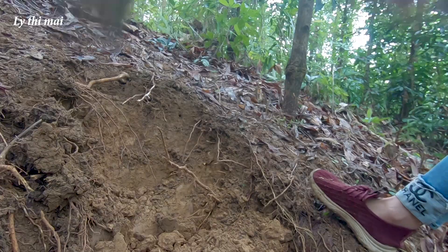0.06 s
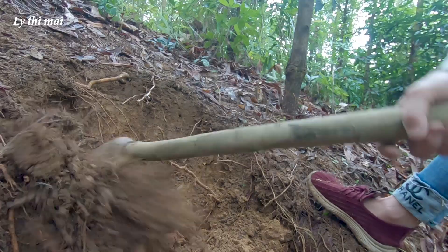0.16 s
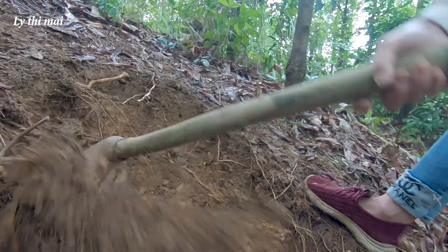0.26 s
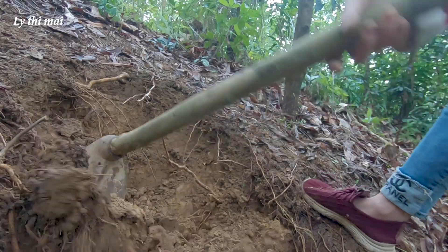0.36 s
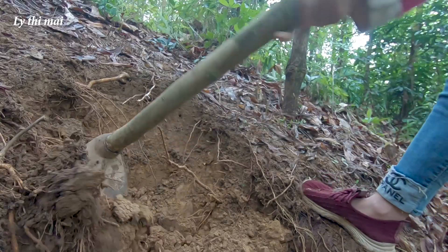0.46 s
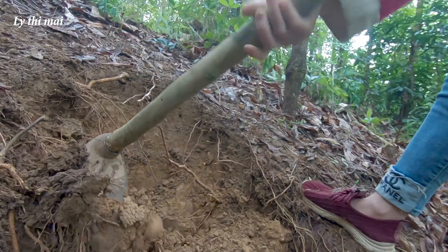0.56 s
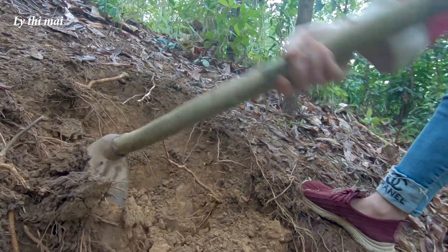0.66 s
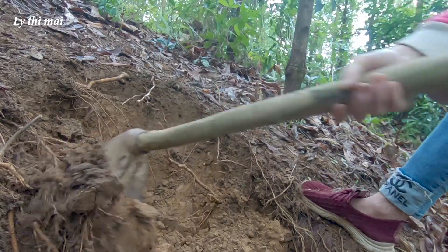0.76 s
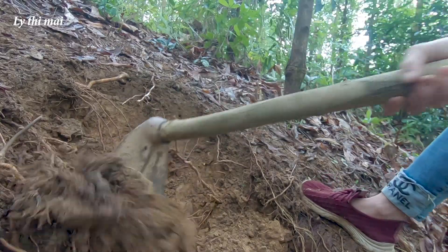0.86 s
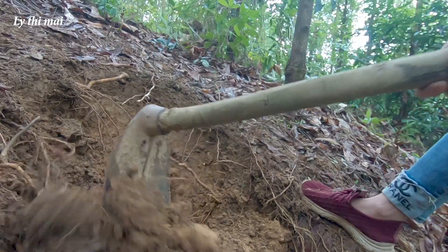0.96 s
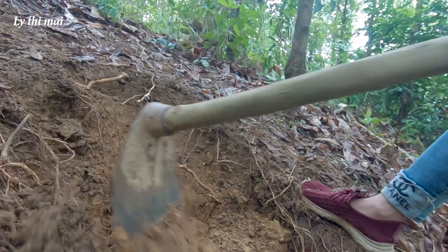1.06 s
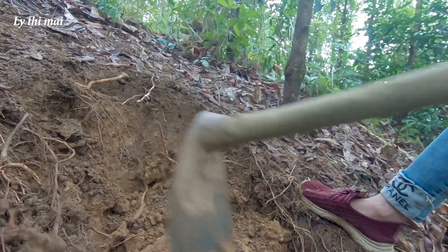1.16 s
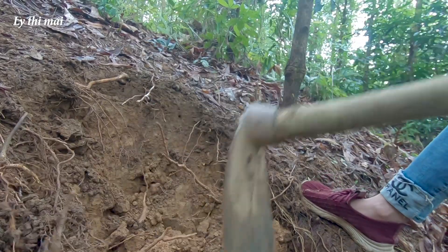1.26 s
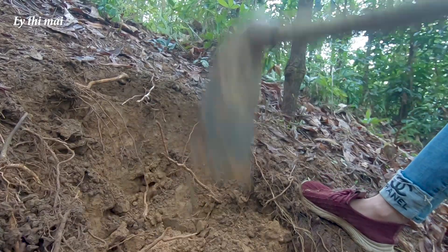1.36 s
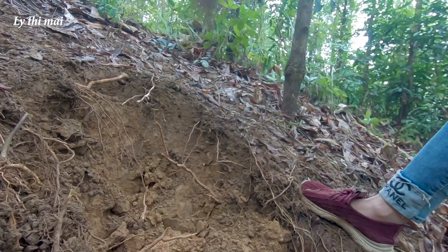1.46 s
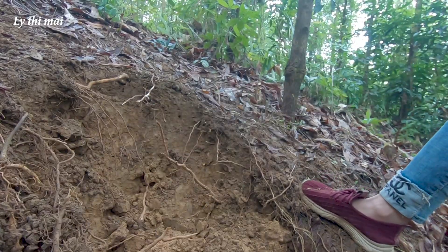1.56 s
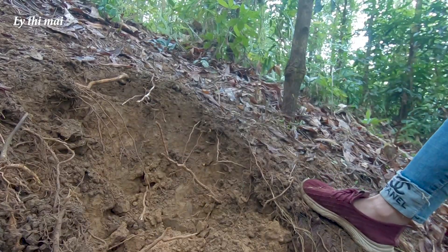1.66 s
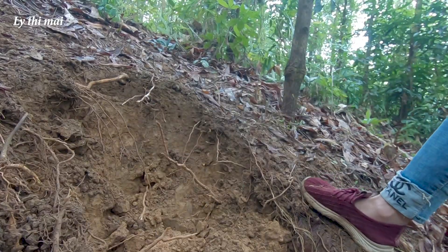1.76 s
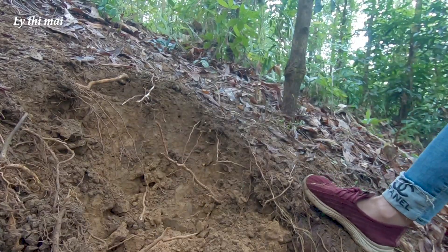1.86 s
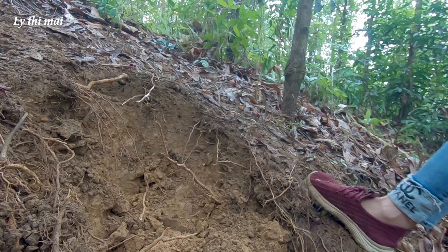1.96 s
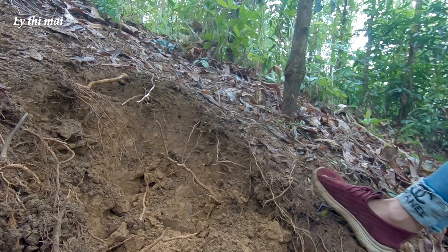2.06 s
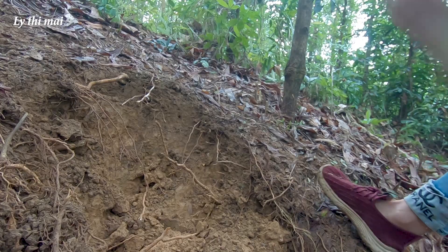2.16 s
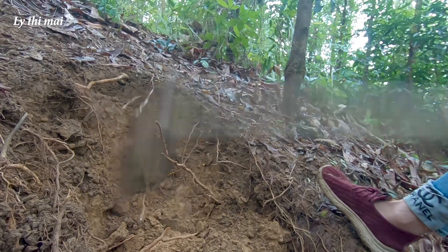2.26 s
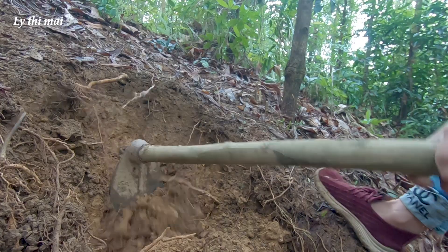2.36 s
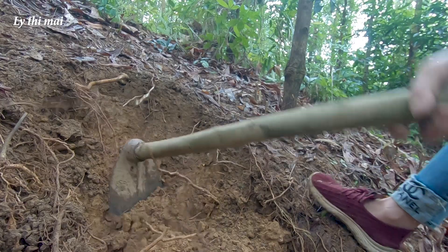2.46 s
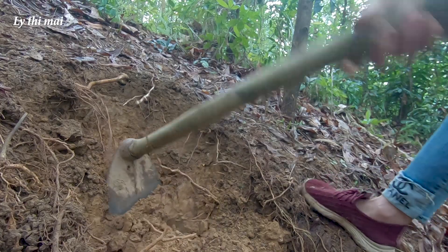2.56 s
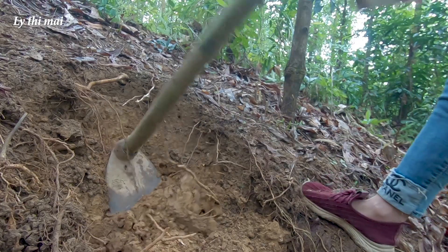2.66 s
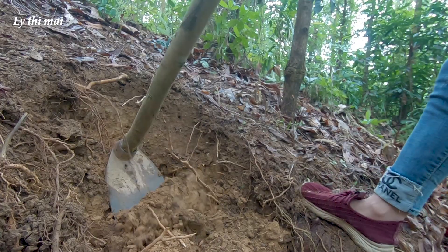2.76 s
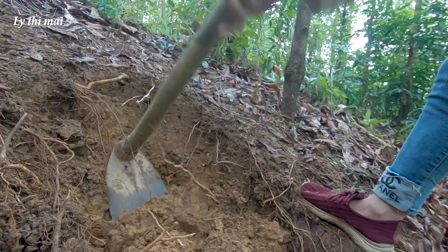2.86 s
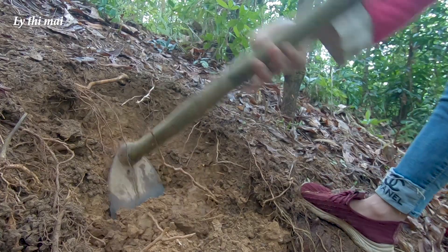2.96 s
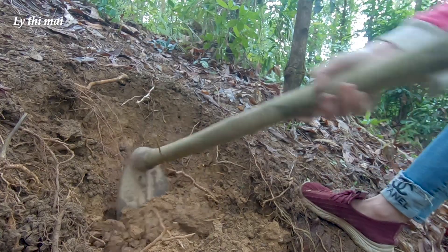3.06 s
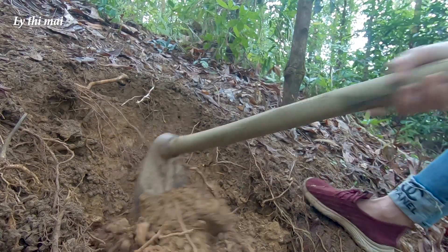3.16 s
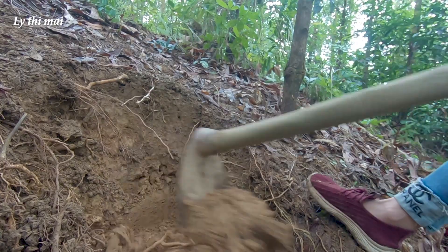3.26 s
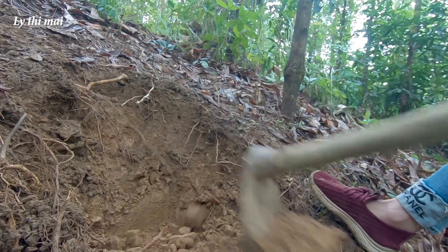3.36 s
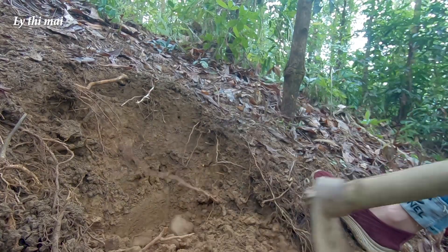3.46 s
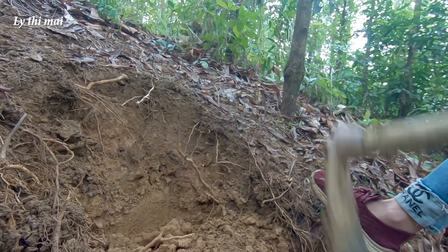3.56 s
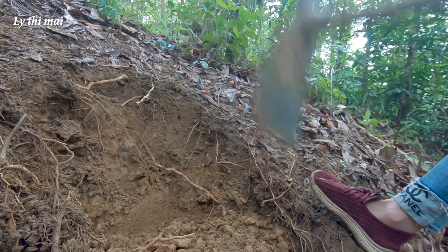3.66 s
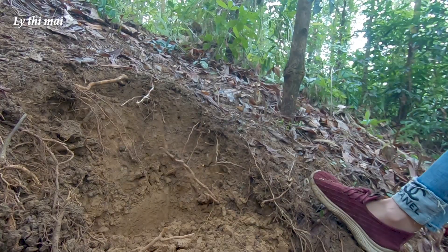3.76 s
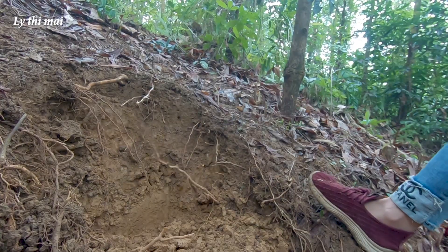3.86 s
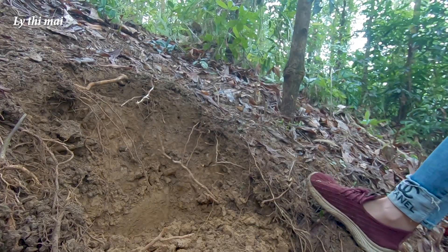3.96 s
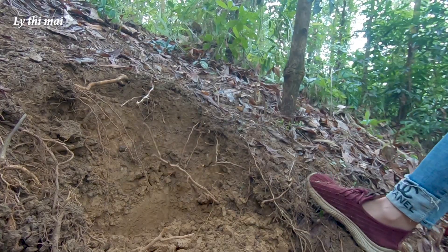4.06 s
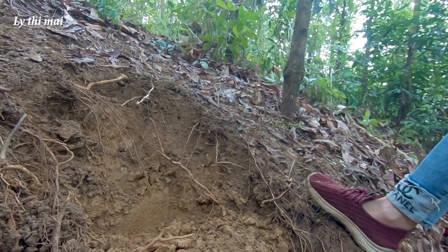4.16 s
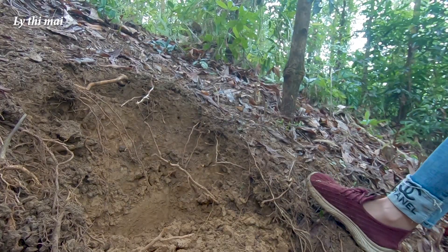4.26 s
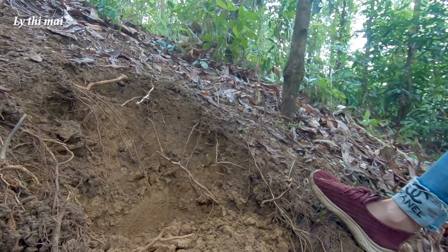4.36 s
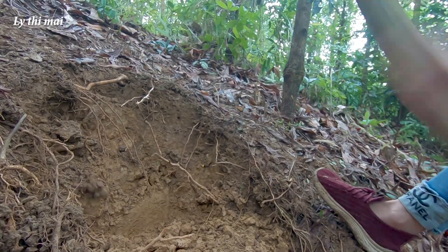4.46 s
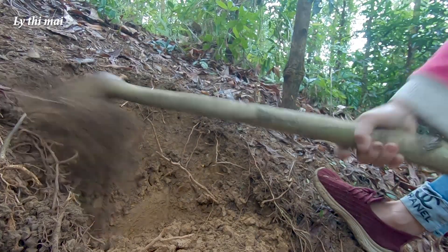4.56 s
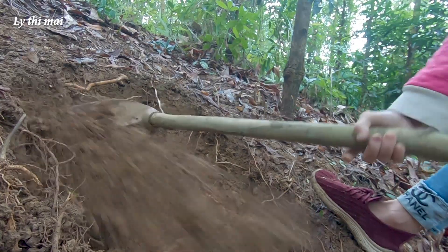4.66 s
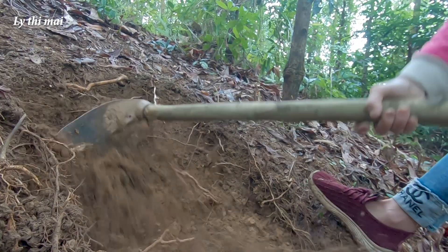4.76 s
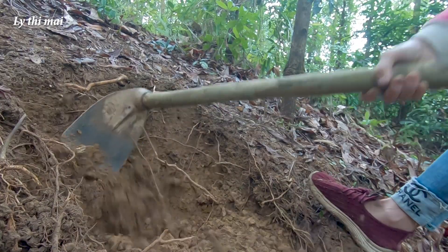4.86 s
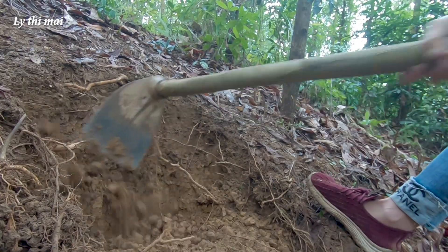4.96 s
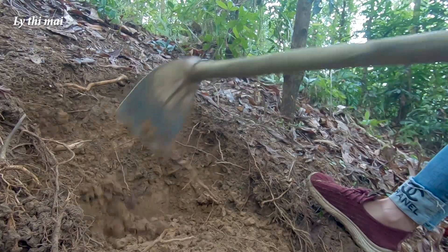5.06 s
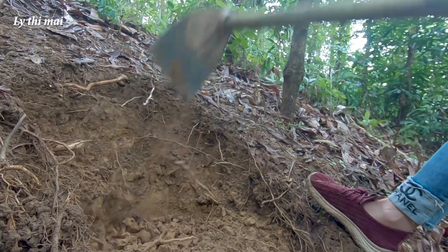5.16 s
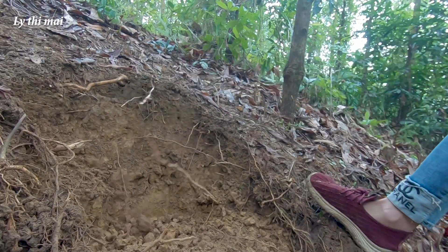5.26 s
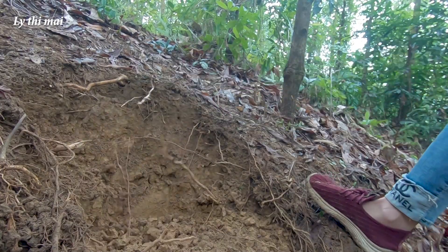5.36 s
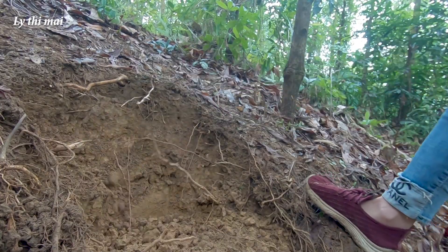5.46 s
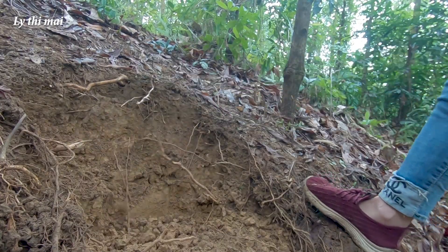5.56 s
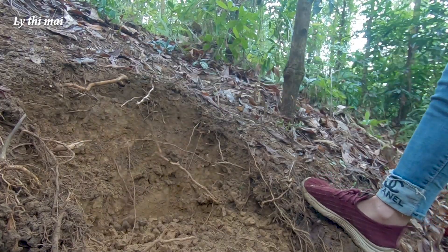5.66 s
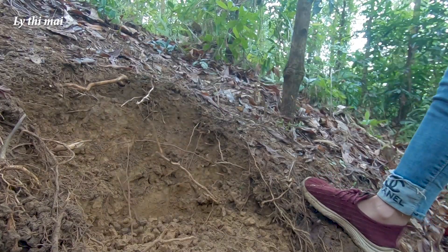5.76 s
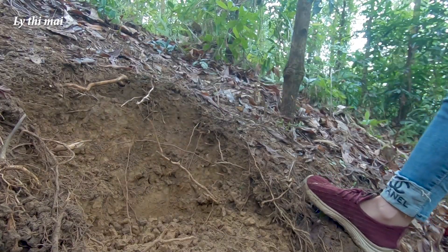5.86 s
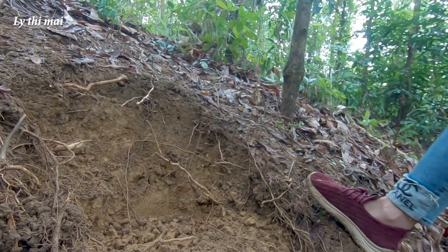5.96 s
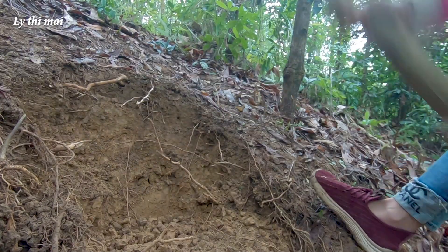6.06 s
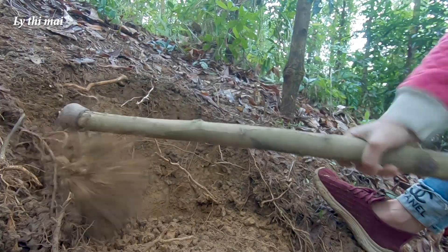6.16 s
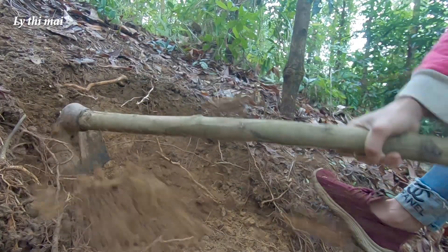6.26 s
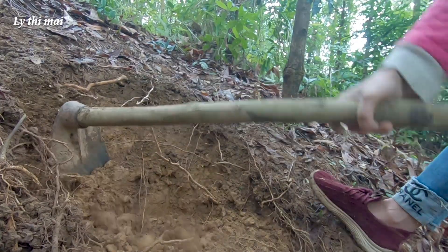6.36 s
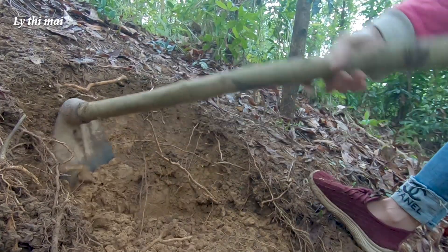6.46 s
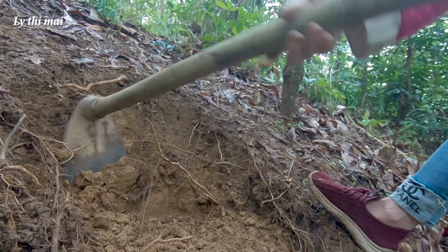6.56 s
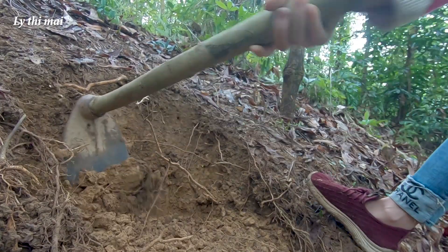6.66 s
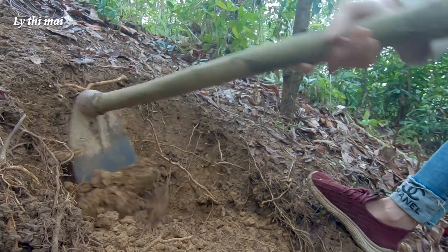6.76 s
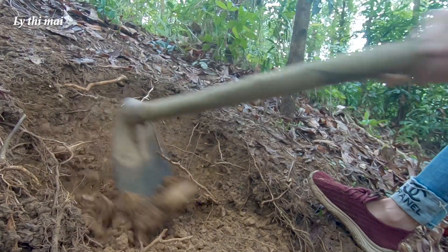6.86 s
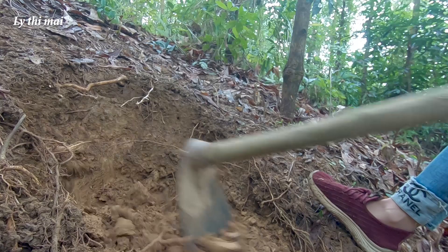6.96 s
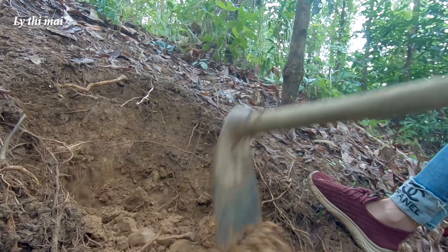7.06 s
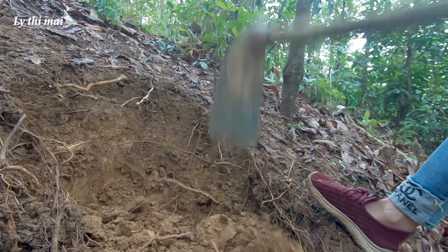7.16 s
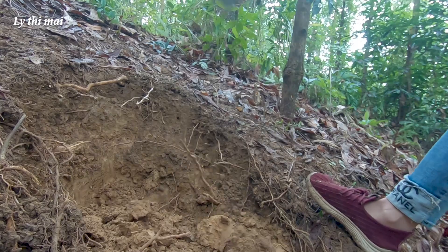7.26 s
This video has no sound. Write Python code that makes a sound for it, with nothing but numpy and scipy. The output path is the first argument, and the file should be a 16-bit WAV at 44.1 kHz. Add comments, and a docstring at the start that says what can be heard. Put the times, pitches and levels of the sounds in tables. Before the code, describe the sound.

Five heavy hoe chops crunch and thud into a dry earth bank close by, with crumbs pattering down and roots snapping in quiet woods.

```python
"""Five chops of a steel hoe into a dry earth bank, about a metre from a small camera in a quiet forest.
Each chop crushes soil (streams of grain impacts shaped by pushes), thumps the ground (decaying sines) and
rings the blade (resonances). Steel scrapes, roots snap, hollow knocks sound, crumbs and sand run down (grain
streams). A faint insect-like hiss near 5.5 kHz (filtered noise) is heard more clearly later on.
The sound starts mono and opens to stereo."""
import sys
import numpy as np
from scipy import signal
from scipy.fft import rfft, irfft
from scipy.io import wavfile
from scipy.ndimage import uniform_filter1d

SR = 44100
rng = np.random.default_rng(int(sys.argv[2]) if len(sys.argv) > 2 else 0)


def store_wav(level_fs):
    """Save 16-bit WAV to argv[1]."""
    pcm = np.round(np.clip(np.atleast_2d(level_fs), -1, 1) * 32767)
    wavfile.write(sys.argv[1], SR, pcm.T.astype(np.int16))


N = 322812
TIME = np.arange(N) / SR
TICKS = np.arange(0, N / SR + .001, .001)  # envelope clock, s

# Quiet forest air. Each row: frequency in Hz, relative density in dB per Hz.
FOREST_COLOUR = [(60, -8), (135, -12), (185, 2.5), (225, -2), (290, -12.5), (520, -16.5), (790, -9),
                 (1100, -19), (1550, -14.5), (3200, -19.5), (4150, -9.5), (6500, -27.5), (10000, -32),
                 (15000, -61.5)]
FOREST_DB = -62.5
# Faint insect-like hiss, level as heard through the camera. Each row: time in seconds, level in dB.
INSECT_HISS = [(0, -81), (2.3, -82.5), (2.6, -71.5), (4.3, -64.5), (5.7, -65), (7.32, -61)]
# Low rumble of the air. Each row: time in seconds, level in dB.
AIR_RUMBLE = [(0, -50.5), (3.3, -55.5), (5.6, -69), (7.32, -64.5)]
# Rumble and puff colour. Each row: frequency in Hz, relative gain in dB.
LOWS_COLOUR = [(15, -4.5), (35, 6.5), (60, -0.5), (110, -9), (190, -1), (250, -17.5), (400, -27.5),
               (1000, -58)]
# Faint tone on the downswing before the third chop.
SWING_S, SWING_DB, SWING_RISE_S, SWING_FALL_S = 2.31, -60.5, .17, .055

# Loose earth sliding. Each row: start in seconds, length in seconds, levels in dB of clods,
# crumbs and sand, as heard; the camera muffles the sand before about 2.4 s.
SLIDES = [(0, 0.48, -67, -66.5, -100), (.29, 0.17, -61.5, -53.5, -70), (0.498, .13, -55, -48, -67.5),
          (0.659, 0.26, -61, -51.5, -70.5), (0.736, 0.0048, -53, -39.5, -56),
          (0.977, 0.23, -52, -48, -61.5), (1.239, 0.045, -44, -40.5, -69), (1.722, 0.2, -65.5, -54.5, -75),
          (2.4, 0.37, -59.5, -55, -63), (2.89, 0.43, -69, -62, -64), (3.148, 0.033, -55, -49, -55.5),
          (3.369, 0.086, -51.5, -49.5, -57), (3.539, 0.043, -53.5, -50.5, -55.5),
          (3.651, 0.39, -61.5, -56, -55), (3.805, 0.12, -58.5, -54, -48), (4.133, 0.025, -69, -49.5, -48),
          (4.695, .57, -60.5, -53.5, -50.5), (4.837, 0.003, -45, -35.5, -39), (6.253, 0.3, -68, -58, -59),
          (6.586, 0.13, -47, -43.5, -41), (6.74, .1, -48, -46.5, -44), (6.911, 0.22, -52.5, -53, -52.5),
          (7.105, 0.02, -51, -45, -46)]
SLIDE_RISE_S, SLIDE_SAG_DB_PER_S = .023, 2.5
SETTLE_S, SETTLE_SHARE = .0079, .07  # fall time: a base plus a share of the slide's length
TRICKLE_DB, TRICKLE_S = -6.5, .4  # stragglers: level after a one-second slide, fall time
# Particle colours. Each row: frequency in Hz, relative gain in dB.
CLODS_COLOUR = [(100, -10.5), (220, -5), (380, -4.5), (600, -7.5), (1000, -2), (1400, 0.5), (2200, -24.5),
                (6000, -58.5)]
CRUMBS_COLOUR = [(700, -21), (1300, -3.5), (1800, 1), (2400, 0.5), (3100, 4), (4200, 0), (5200, -14),
                 (8000, -42), (15000, -65)]
SAND_COLOUR = [(3000, -24), (4600, -6), (5600, -4), (7200, 1.5), (8400, -6.5), (10000, -9.5), (11500, -20),
               (15000, -20.5)]
# Bursting crumbs. Each row: frequency in Hz, relative gain in dB.
CRACKLE_COLOUR = [(200, -21.5), (400, -5), (900, -5.5), (1600, 1), (4200, -1), (5500, -20.5), (9000, -17.5),
                  (15000, -41.5)]
CRACKLE_DB = -5.5  # relative to the patter
ROLL_DB = -4  # rumble relative to the clod level
# Low rumble swelling just before and around a heavy chop. Each row: start of the hold in seconds,
# hold in seconds, level in dB.
CHOP_RUMBLES = [(0.206, 0.34, -46.5), (2.397, 0.077, -43), (4.671, 0.086, -45), (6.25, 0.026, -45)]
RUMBLE_RISE_S, RUMBLE_FALL_S = .056, .079

# Modes of the bank. Each row: frequency in Hz at pitch 1, relative level in dB, t60 in seconds.
GROUND = [(43.3, -17.5, 0.32), (77, -8.5, 0.16), (129.5, 0, 0.078), (189.9, -3, 0.065)]
# Levering, heavy clods and a shifting foot. Each row: time in seconds, thud peak in dB, pitch as a multiple of
# the modes.
THUMPS = [(0.481, -31, .6), (.893, -28.5, 1.1), (2.662, -31, 1.3), (3.54, -37.5, 1), (5.084, -35.5, 1),
          (6.115, -40, 1), (6.431, -30, .9), (6.525, -22, .8), (6.791, -29.5, 1.2), (6.95, -32, 1),
          (7.086, -31.5, 1.2)]
THUD_LAG_MS, REBOUND_LAG_MS, REBOUND_PITCH = 2.5, 20, .68  # pitch relative to the thud

# Blade and handle. Each row: mode frequency in Hz, relative level in dB, t60 in seconds at damping 1.
HOE = [(506, -14, .07), (620, -16.5, .05), (770, -9, 0.1), (910, -10, .06), (1195, -10.5, .06),
       (1582, -5, .09), (1990, -4, 0.1), (3045, 4, 0.065), (3130, 2, 0.029), (3420, -5, 0.05),
       (4130, 6, 0.065), (4580, -4, 0.09), (6400, -3, 0.14), (8480, -9, 0.13), (10850, -20, .05)]
# Earth scraping on free steel. Each row: peak in seconds, rise in seconds, fall in seconds,
# coarse soil in dB, fine sand in dB.
SCRAPES = [(1.154, .011, 0.0064, -45, -29), (1.252, 0.033, 0.017, -35, -40.5), (1.4, .15, .1, -61, -66.5),
           (1.887, .06, 0.012, -46, -53), (2.0, .1, 0.24, -80.5, -74), (5.083, 0.011, .01, -28, -52)]
# Squeaks. Each row: time in seconds, rms in dB at the middle, pitch in Hz there, half length in ms.
SQUEAKS = [(1.496, -45.5, 1379, 12), (6.465, -44, 1690, 15.3), (6.565, -45, 1380, 8),
           (6.598, -36.5, 1300, 4)]
# Hollow knocks: clods landing, and the low-mid body of four chops.
# Each row: time in seconds, peak in dB, pitch in Hz.
KNOCKS = [(.236, -13.5, 500), (.897, -32.5, 630), (1.077, -42, 400), (1.156, -12, 430), (2.414, -9.5, 700),
          (2.595, -42, 900), (3.21, -38.5, 880), (3.363, -35.5, 500), (3.385, -37.5, 344),
          (3.409, -39, 400), (3.438, -34.5, 395), (3.903, -33, 1000), (5.084, -32.5, 790),
          (6.254, -15, 354), (6.695, -35.5, 900), (6.789, -40, 280), (6.949, -26.5, 620),
          (7.092, -34.5, 326), (7.122, -39.5, 410)]
# Roots and twigs snapping, pebbles ticking. Each row: time in seconds, centre peak in dB before the
# treble cut, pitch in Hz, left minus right in dB.
SNAPS = [(0.124, -39, 2020, -22), (.362, -33, 2840, 3), (0.482, -28, 1690, -5), (0.614, -30, 1330, 7),
         (1.021, -26.5, 2530, -5), (1.599, -39.5, 2530, -9), (2.558, -31, 3220, 1), (2.63, -17, 1870, -3.5),
         (2.77, -23, 2880, -1), (3.32, -33.5, 6440, -1), (3.411, -24, 1660, 1), (3.56, -35, 3040, -1),
         (3.84, -30, 6800, -19), (4.31, -41.5, 2320, 2), (4.404, -37, 6800, 0), (4.802, -21, 6500, -4),
         (4.829, -21.5, 1640, -5), (4.947, -26, 7200, -8), (4.998, -26.5, 6360, -6),
         (5.279, -28.5, 6400, -20), (5.814, -39.5, 2150, -2.5), (6.446, -12.5, 3420, -9),
         (6.462, -22, 1940, 7), (6.476, -19, 7600, -4), (6.496, -8, 6260, -16), (6.498, -21, 3280, 4),
         (6.52, -30, 1900, 5), (6.562, -24.5, 1400, 0)]
# Steel clipping a stone. Each row: time in seconds, peak in dB, contact in ms.
STONES = [(1.1552, -3, 0.052), (5.0814, -22.5, 0.071)]

# Soil and grit colours. Each row: frequency in Hz, relative gain in dB.
CRUSH_COLOUR = [(200, -18.5), (450, -13.5), (620, 0), (850, -0.5), (1400, 1.5), (1950, 5.5), (2600, -4),
                (4300, 1), (5400, -24), (9000, -43), (16000, -74)]
GRIT_COLOUR = [(2500, -31.5), (4500, -0.5), (5500, -3), (6800, -0.5), (8500, -11.5), (11000, -21.5),
               (15000, -32.5)]
# Lumps crushed between chops. Each row: time in seconds, level in dB, softness in ms, relative grit in dB.
CRUNCHES = [(0.495, -39.5, 2, -25), (.716, -33, .9, -11.5), (0.894, -37, 3, -41), (2.444, -41.5, 5.5, 0),
            (2.629, -31.5, 2, -17), (2.705, -31.5, 1.9, -13), (3.44, -30, 1.7, -18), (3.908, -46, 4.8, -3),
            (4.847, -33, 6.6, -5), (6.95, -37, 2.7, 2), (7.108, -39.5, 2.4, 9)]
# Chops: the edge enters the crust, the blade bites, then jams. Each row: bite in seconds, bite in dB,
# soil softness in ms, relative grit in dB as heard, relative blade ring in dB, left minus right in dB,
# entry lead in ms, entry in dB, stop lag in ms, stop in dB, thud peak in dB,
# thud pitch as a multiple of the modes, rebound peak in dB.
CHOPS = [(0.2314, -14, 5.47, -29, -10, -9, 16, -43.5, 19, -18, -6.5, 1.15, -4.5),
         (1.1565, -19, 1.67, -3.5, -2, -6, 9.9, -36.5, 5.4, -41, -10.5, 1.2, -25),
         (2.41, -17.5, 3.7, -17, -13, 9, 18.5, -26, 7.6, -16.5, -4, 1, -15.5),
         (4.6712, -17, 2.5, -4, -6.5, 19, 4.9, -27.5, 15, -23, -6.5, .85, -8),
         (6.2542, -10.5, 1.77, -8, -13, 6.5, 8.8, -25, 12.5, -30, -5, 1, -33.5)]
ENTRY_RISE, CRUNCH_RISE, BITE_FALL = .7, 1, 2.4  # rise and fall times as multiples of the softness
ENTRY_FALL_MS, ENTRY_GRIT_DB, ENTRY_RING_DB = 5.5, -1, 8.5  # still free, the blade rings more
STOP_RISE_MS, STOP_FALL_MS, STOP_GRIT_DB = 1.6, 5.6, 6.5
ENTRY_PAN_DB, STOP_PAN_DB = -1, -1.5  # left minus right
CRUNCH_RING_DB = -8.5

# Microphone response. Each row: frequency in Hz, gain in dB.
MICROPHONE = [(20, -6), (45, -1.5), (7500, -2.5), (10000, -2.5), (13000, -4), (16000, -9.5)]
# Stereo width of the camera. Each row: time in seconds, share from 0 to 1.
WIDTH = [(0, 0), (1.9, 0.01), (2.4, 0.27), (3.3, 0.5), (3.8, 1), (7.32, 1)]
TOP_HZ = 15700


def undb(db):
    """Decibels to gain."""
    return 10 ** (np.asarray(db) / 20)


def curve(table):
    """Points joined by straight lines, one value per sample."""
    return np.interp(TIME, *np.transpose(table))


def smooth(envelope):
    """Fill a per-ms envelope in to one value per sample."""
    return np.interp(TIME, TICKS, envelope)


def swell(s, rise_s, fall_s, hold_s=0):
    """Per-ms envelope: exponential rise up to time s, hold, exponential fall."""
    before = np.maximum((s - TICKS) / rise_s, 0)
    after = np.maximum((TICKS - s - hold_s) / fall_s, 0)
    return np.exp(-np.minimum(before + after, 30))


def unit(x):
    """Scale a stereo sound so that its centre has rms 1."""
    return x / np.sqrt(np.mean(x.mean(0) ** 2))


def steady(x, span_s):
    """Even out the slow level to about rms 1, leaving single grains standing."""
    size = int(span_s * SR / 2) + 1
    power = uniform_filter1d(x.mean(0) ** 2, size)
    return x / np.sqrt(np.abs(uniform_filter1d(power, size)) + 1e-12)


def add(out, s, x):
    """Mix a short sound in at time s."""
    i = int(s * SR)
    out[..., i:i + x.shape[-1]] += x[..., :N - i]


def sides(pan_db):
    """Left and right gains that keep the centre level."""
    gain = undb(np.array([[pan_db], [-pan_db]]) / 2)
    return gain / gain.mean()


def lowpass(x, hz):
    """Fourth-order treble cut."""
    return signal.sosfilt(signal.butter(4, hz, fs=SR, output="sos"), x)


def resonate(x, hz, width_hz):
    """Two-pole resonance with gain 1 at its centre."""
    return signal.lfilter(*signal.iirpeak(hz, hz / width_hz, SR), x)


def colour(x, points, size=1024):
    """Minimum-phase filter with the given spectrum, so that clicks keep their sharp front."""
    hz, db = np.transpose(points)
    bins_hz = np.arange(size // 2 + 1) * SR / size
    log_gain = np.log(undb(np.interp(np.log(bins_hz + 1), np.log(hz), db)))
    cepstrum = irfft(log_gain)
    cepstrum[1:size // 2] *= 2  # fold to the causal half
    cepstrum[size // 2 + 1:] = 0
    impulse = irfft(np.exp(rfft(cepstrum)))
    return signal.oaconvolve(x, impulse[None], axes=1)[:, :x.shape[1]]


def air(apart):
    """Stereo noise; apart sets how unlike the two sides are."""
    mid, side = rng.standard_normal((2, N))
    return mid + apart * side * np.array([[1], [-1]])


def grains(rate, spread_db, scatter_db, lag_ms, low_hz, high_hz, cycles, clump_db=0, count=7):
    """Particle impacts, mostly small, a few large, in pitch bands; each reaches the two sides its own way."""
    draw = rng.random((int(rate * N / SR), 5)).T
    at = (draw[0] * (N - 1)).astype(int)
    size = undb(-spread_db * np.log(draw[1] + .01))
    lean = undb(scatter_db * (draw[2] - .5))
    lag = np.round(lag_ms * SR / 1000 * (2 * draw[3] - 1)).astype(int)
    late = np.clip(at + lag, 0, N - 1)
    band = (draw[4] * count).astype(int)
    # grains of one band share a level in flurries of about 20 ms
    flurry = at // 900
    size = size * undb(clump_db * rng.standard_normal((N // 900 + 1, count))[flurry, band])
    out = 0
    for k, hz in enumerate(np.geomspace(low_hz, high_hz, count)):
        own = band == k
        left = np.bincount(at[own], (size * lean)[own], N)
        right = np.bincount(late[own], (size / lean)[own], N)
        out = out + (-1) ** k * resonate(np.array([left, right]), hz, hz / cycles) / np.sqrt(hz)
    return out


def forest():
    """Filtered noise: forest air, a faint insect-like hiss, low rumble and a thin tone as the hoe swings."""
    hush = unit(colour(air(.6), FOREST_COLOUR, size=2048)) * undb(FOREST_DB)
    hiss = resonate(resonate(air(.8), 5520, 650), 5520, 650)
    insect_hiss = unit(hiss) * undb(curve(INSECT_HISS))
    rumble = unit(colour(air(1.0), LOWS_COLOUR, size=4096)) * undb(curve(AIR_RUMBLE))
    whistle = resonate(resonate(air(.2), 1596, 50), 1572, 50)
    swing = undb(SWING_DB) * smooth(swell(SWING_S, SWING_RISE_S, SWING_FALL_S))
    return hush + insect_hiss + rumble + unit(whistle) * swing


def trees(x, t60_s=.55, wet_db=-27):
    """Trunks and the slope scatter a faint, short echo: convolution with decaying noise."""
    t = np.arange(SR // 2) / SR
    decay = np.exp(-np.log(1000) * t / t60_s) * (1 - np.exp(-t / .01))
    echo = resonate(rng.standard_normal((2, len(t))) * decay, 2900, 4400)
    echo = echo / np.sqrt(np.sum(echo[0] ** 2))
    return undb(wet_db) * signal.oaconvolve(x.mean(0)[None], echo, axes=1)[:, :N]


def flow():
    """Strength of clods, crumbs and sand: each slide rises quickly, thins, settles and leaves a trickle."""
    power = 0
    for s, length_s, *levels_db in SLIDES:
        sag = undb(-SLIDE_SAG_DB_PER_S * np.clip(TICKS - s, 0, length_s))
        run = swell(s, SLIDE_RISE_S, SETTLE_S + SETTLE_SHARE * length_s, length_s)
        trickle = undb(TRICKLE_DB) * np.sqrt(length_s) * swell(s, SLIDE_RISE_S, TRICKLE_S, length_s)
        power = power + (undb(levels_db)[:, None] * sag * (run + trickle)) ** 2
    return map(smooth, np.sqrt(power))


def crackle(rate=45, spread_db=5, scatter_db=14, burst_s=.0024):
    """Larger crumbs burst as they land: decaying noise standing out of the patter."""
    out, t = np.zeros((2, N)), np.arange(SR // 60) / SR
    for when, draw, side in rng.random((int(rate * N / SR), 3)):
        burst = rng.standard_normal(len(t)) * np.exp(-t / burst_s)
        level = undb(-spread_db * np.log(draw + .05))
        add(out, when * N / SR, level * sides(scatter_db * (side - .5)) * burst)
    return steady(colour(out, CRACKLE_COLOUR), .876)


def slide():
    """Clods roll and rumble, crumbs patter down the bank, sand hisses on the dead leaves to the right."""
    clods = colour(grains(rate=330, spread_db=1.5, scatter_db=14, lag_ms=.49, low_hz=280, high_hz=1425,
                          cycles=4.5, clump_db=2.0, count=5), CLODS_COLOUR)
    crumbs = colour(grains(rate=2400, spread_db=2.0, scatter_db=9.5, lag_ms=.27, low_hz=1490, high_hz=4360,
                           cycles=3, clump_db=2.5, count=5), CRUMBS_COLOUR)
    sand = colour(grains(rate=3500, spread_db=1, scatter_db=12.5, lag_ms=.2, low_hz=4850, high_hz=12500,
                         cycles=3.3, clump_db=2.5, count=4), SAND_COLOUR)
    clod_flow, crumb_flow, sand_flow = flow()
    chop_rumble = smooth(sum(undb(db) * swell(s, RUMBLE_RISE_S, RUMBLE_FALL_S, hold_s)
                             for s, hold_s, db in CHOP_RUMBLES))
    rumble = unit(colour(air(.69), LOWS_COLOUR, size=4096))
    patter = steady(crumbs, .28) + undb(CRACKLE_DB) * crackle()
    return (steady(clods, .074) * clod_flow * sides(-.47)
            + patter * crumb_flow * sides(-3.5)
            + steady(sand, .089) * sand_flow * sides(-6.0)
            + rumble * (chop_rumble + undb(ROLL_DB) * clod_flow))


def jolts():
    """Every blow to the ground (s, dB, pitch); a chop thuds, then rebounds lower."""
    for s, *_, thud_db, pitch, rebound_db in CHOPS:
        yield s + THUD_LAG_MS / 1000, thud_db, pitch
        yield s + REBOUND_LAG_MS / 1000, rebound_db, pitch * REBOUND_PITCH
    yield from THUMPS


def thumps(contact_s=.00094, puff_s=.04):
    """The soft bank answers a blow with a dull thud; a puff of air pushes the two sides oppositely."""
    out, puff, t = np.zeros(N), np.zeros(N), np.arange(SR // 3) / SR
    for s, db, pitch in jolts():
        thud = sum(undb(mode_db) * np.sin(2 * np.pi * hz * pitch * t) * np.exp(-np.log(1000) * t / t60_s)
                   for hz, mode_db, t60_s in GROUND)
        thud = thud * (1 - np.exp(-t * pitch / contact_s))
        add(out, s, undb(db) * thud / np.abs(thud).max())
        add(puff, s, undb(db) * np.exp(-t / puff_s) * (1 - np.exp(-t / .005)))
    low_noise = lowpass(rng.standard_normal((1, N)), 110)
    swirl = steady(colour(low_noise, LOWS_COLOUR, size=4096), .08)
    return out + undb(-14) * puff * swirl * np.array([[1], [-1]])


def hoe(drive, damping=1):
    """Blade and handle modes ring with whatever shakes them; damping shortens every t60."""
    return sum(undb(db) * np.sqrt(t60_s / damping)
               * resonate(drive, hz, damping * np.log(1000) / np.pi / t60_s) for hz, db, t60_s in HOE)


def scrape():
    """Soil slides over free steel: coarse grains ring its lower modes, fine sand its high ones."""
    coarse = hoe(grains(rate=1600, spread_db=4, scatter_db=4.5, lag_ms=.05, low_hz=1990, high_hz=3050,
                        cycles=6.2, count=2))
    fine = hoe(grains(rate=1700, spread_db=2.5, scatter_db=4.5, lag_ms=.083, low_hz=6400, high_hz=10960,
                      cycles=7, count=3))
    coarse_flow, fine_flow = sum(undb(levels_db)[:, None] * swell(s, rise_s, fall_s)
                                 for s, rise_s, fall_s, *levels_db in SCRAPES)
    return steady(coarse, .033) * smooth(coarse_flow) + steady(fine, .045) * smooth(fine_flow)


def squeaks(glide=1.0):
    """Brief sines that sink slightly, as of a root rubbing on the steel."""
    out, t = np.zeros(N), np.arange(-SR // 20, SR // 20) / SR
    for s, db, hz, half_ms in SQUEAKS:
        tone = np.sqrt(2) * np.sin(2 * np.pi * hz * (t - glide * t ** 2))
        add(out, s + t[0], undb(db) * tone * np.exp(-(1000 * t / half_ms) ** 2))
    return out


def knocks(decay_s=.0015, sharpness=3.4):
    """Hollow knocks of landing clods and of the body of four chops: noise bursts through two resonances."""
    out, t = np.zeros(N), np.arange(SR // 12) / SR
    for s, db, hz in KNOCKS:
        burst = rng.standard_normal(len(t)) * np.exp(-t / decay_s)
        knock = resonate(resonate(burst, hz, hz / sharpness), hz, 2 * hz)
        add(out, s, undb(db) * knock / np.abs(knock).max())
    return out


def snaps(tear_s=.0009, tail_s=.0048, tail_db=-18, apart=1.0):
    """A fibre tears in a ms or two and the piece rings briefly at its own pitch."""
    out, t = np.zeros((2, N)), np.arange(SR // 20) / SR
    decay = np.exp(-t / tear_s) + undb(tail_db) * np.exp(-t / tail_s)
    for s, db, hz, pan_db in SNAPS:
        mid, side = rng.standard_normal((2, len(t)))
        tear = (mid + apart * side * np.array([[1], [-1]])) * decay
        snap = resonate(tear, hz, hz / 1.5) + undb(-12) * tear
        snap = resonate(snap, hz, 1.1 * hz)
        add(out, s, undb(db) * sides(pan_db) * snap / np.abs(snap.mean(0)).max())
    return lowpass(out, 9000)


def clanks(damping=1.64):
    """A stone gives the blade one hard push; the longer the contact, the duller the ring."""
    out, t = np.zeros(N), np.arange(SR // 4) / SR
    for s, db, contact_ms in STONES:
        push = np.exp(-((1000 * t - .5) / contact_ms) ** 2)
        ring = hoe(push, damping)
        add(out, s, undb(db) * ring / np.abs(ring).max())
    return out


def crushes():
    """Every push into the soil: s, dB, rise ms, fall ms, grit dB, blade ring dB, left minus right dB."""
    for s, db, soft_ms, grit_db, ring_db, pan_db, lead_ms, entry_db, lag_ms, stop_db, *_ in CHOPS:
        entry_s, stop_s = s - lead_ms / 1000, s + lag_ms / 1000
        yield (entry_s, entry_db, ENTRY_RISE * soft_ms, ENTRY_FALL_MS,
               grit_db + ENTRY_GRIT_DB, ring_db + ENTRY_RING_DB, ENTRY_PAN_DB)
        yield s, db, soft_ms, BITE_FALL * soft_ms, grit_db, ring_db, pan_db
        yield stop_s, stop_db, STOP_RISE_MS, STOP_FALL_MS, grit_db + STOP_GRIT_DB, ring_db, STOP_PAN_DB
    for s, db, soft_ms, grit_db in CRUNCHES:
        yield s, db, CRUNCH_RISE * soft_ms, BITE_FALL * soft_ms, grit_db, CRUNCH_RING_DB, 0


def chops():
    """Dense grains break within a few ms under each push of the edge and shake the buried steel."""
    body = colour(grains(rate=7000, spread_db=1.5, scatter_db=.5, lag_ms=.051, low_hz=404, high_hz=4420,
                         cycles=1.8), CRUSH_COLOUR)
    grit = colour(grains(rate=8400, spread_db=6, scatter_db=6.0, lag_ms=.083, low_hz=4650, high_hz=11900,
                         cycles=1, count=3), GRIT_COLOUR)
    loam = resonate(resonate(air(.1), 520, 420), 520, 420)
    force, grit_force, loam_force, shake = np.zeros((4, 2, N))
    t = np.arange(-SR // 16, SR // 6) / SR
    for s, db, rise_ms, fall_ms, grit_db, ring_db, pan_db in crushes():
        push = undb(db) * np.exp(-1000 * np.where(t < 0, -t / rise_ms, t / fall_ms))
        add(force, s + t[0], push * sides(pan_db))
        add(grit_force, s + t[0], push * undb(grit_db) * sides(pan_db - .5))
        # pushes with a duller top get a fuller low crunch
        add(loam_force, s + t[0], push * undb(-27.5 - .7 * grit_db))
        add(shake, s + t[0], push * undb(ring_db) * sides(pan_db))
    rasp = steady(grains(rate=3800, spread_db=8.5, scatter_db=1.0, lag_ms=.046, low_hz=400, high_hz=6100,
                         cycles=1, count=4), .011)
    # packed soil damps the steel; level set against the undamped ring
    ring = hoe(rasp * shake, damping=2.9) / np.std(hoe(rasp[:, :SR].mean(0)))
    return (steady(body, .0072) * force + steady(grit, .0019) * grit_force
            + steady(loam, .014) * loam_force + undb(4.5) * ring)


def scene():
    """Digging close by, in the quiet of the forest; only the sharp blows echo."""
    blows = chops() + clanks() + snaps() + knocks()
    return forest() + trees(blows) + slide() + thumps() + scrape() + squeaks() + blows


def record(dry):
    """The camera dulls both ends of the spectrum, widens from mono to stereo and cuts the top treble."""
    heard = colour(dry, MICROPHONE, size=4096)
    mid = heard.mean(0)
    side = (heard[0] - heard[1]) / 2 * curve(WIDTH)
    treble_cut = signal.ellip(8, .2, 70, TOP_HZ, fs=SR, output="sos")
    return signal.sosfilt(treble_cut, np.array([mid + side, mid - side]))


dry = scene()
out = record(dry)
store_wav(out)
```